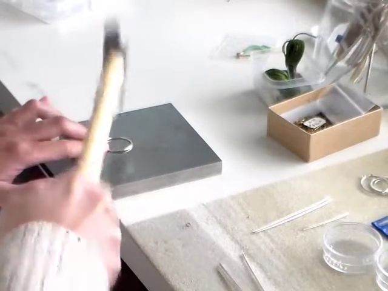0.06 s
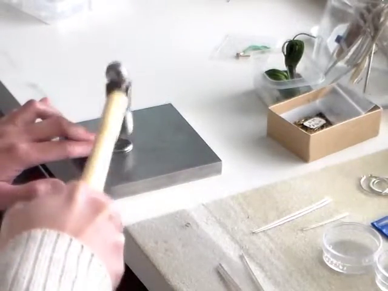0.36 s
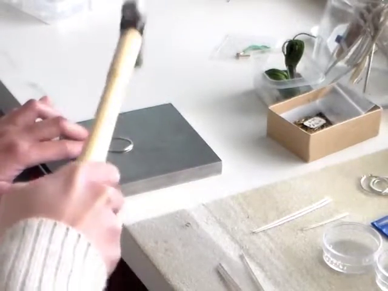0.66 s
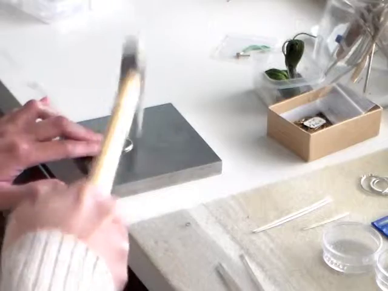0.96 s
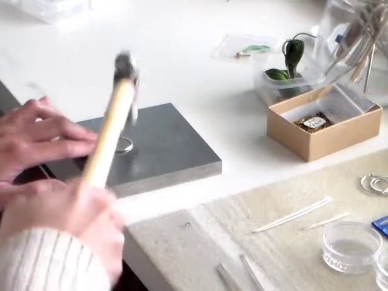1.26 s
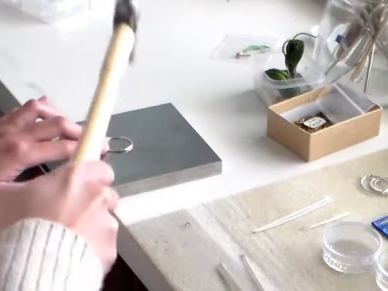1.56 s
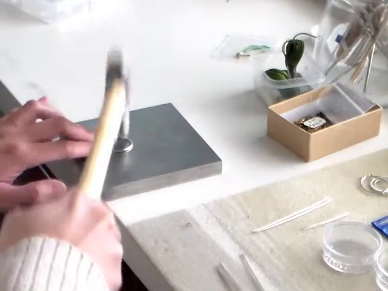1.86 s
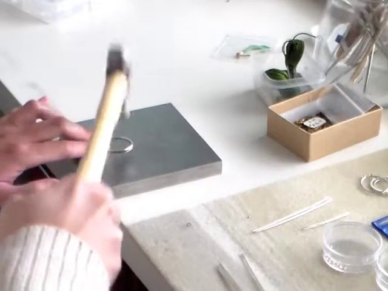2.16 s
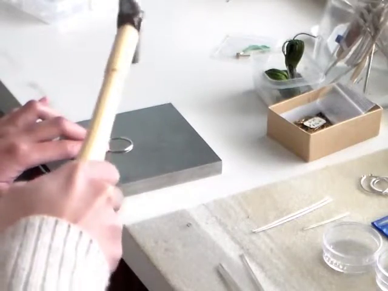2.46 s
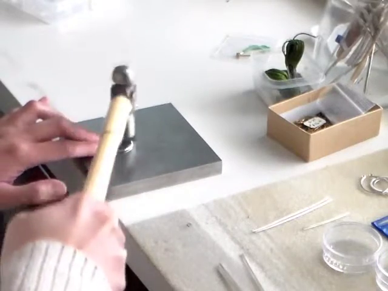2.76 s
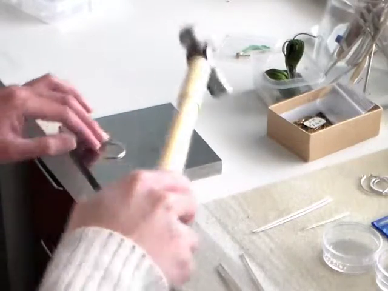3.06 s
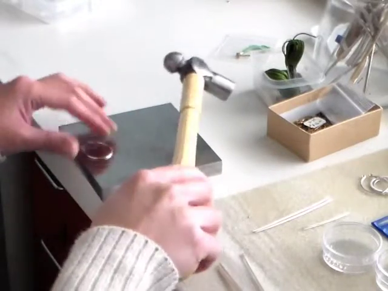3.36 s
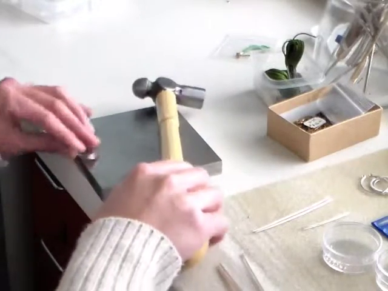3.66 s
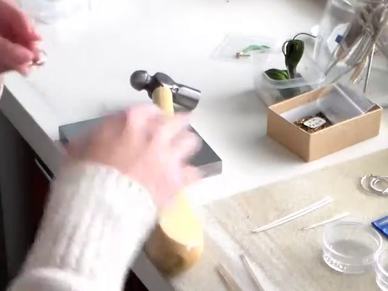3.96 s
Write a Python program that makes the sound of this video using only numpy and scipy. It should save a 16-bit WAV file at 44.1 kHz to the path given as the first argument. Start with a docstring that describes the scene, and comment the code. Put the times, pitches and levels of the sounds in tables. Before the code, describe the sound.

Quick, even hammer blows on a ring against steel, then the hammer is set down.

```python
"""Sharp, steady blows of a small hammer on a metal ring on a steel block, close by in a quiet workroom.
Each blow cracks, rings the hammer head and block, and sends a bending wave through the bench;
the room answers. Then the ring is slid off, the head is set on the block and the wooden handle
knocks down. A limiter ducks at every blow."""
import sys
import numpy as np
from scipy import signal
from scipy.fft import rfft, irfft
from scipy.io import wavfile
from scipy.ndimage import uniform_filter1d, minimum_filter1d

SR = 44100
rng = np.random.default_rng(int(sys.argv[2]) if len(sys.argv) > 2 else 0)


def wrap_up_sound(samples):
    """Save the sound to the file named by the first command line argument, as 16-bit audio."""
    columns = np.atleast_2d(samples).T
    # keep every value between -1 and 1, then stretch to whole-number steps
    tamed = np.clip(columns, -1, 1)
    steps = np.round(tamed * 32767).astype(np.int16)
    wavfile.write(sys.argv[1], SR, steps)


N = 176400
RESPONSE_N, LEAD_N = 36000, 11025
TIME_S, AGE_S = np.arange(N) / SR, np.arange(RESPONSE_N) / SR
SCENE_HZ, RESPONSE_HZ = np.fft.rfftfreq(N, 1 / SR), np.fft.rfftfreq(RESPONSE_N, 1 / SR)


# Hammer blows. Each row: start in seconds, strength in dB, then treble, head, block, bench offsets in dB.
BLOWS = [(-.18, -1, 0, -1, 0, -2), (0.0425, 4.5, 3.5, 2, 0, 1.5), (0.2625, 1.5, -3.5, 5.5, 0.5, 1.5),
         (0.4819, -4, -7.5, 5.5, -5, 1), (.7066, 9.5, 1, 5.5, 1, -0.5), (0.9291, 3, 3, 2.5, 0.5, 1),
         (1.1513, 2.5, 10.5, -1, -3.5, 0.5), (1.3865, 5, 5, 2.5, 1.5, -1), (1.6084, 3.5, 5.5, -2.5, 1, -1),
         (1.8339, 1, 2.5, 5.5, 1.5, 2), (2.0473, 0, 0, 6, 3, 1), (2.2657, 7, 6, 6, 0.5, 1.5),
         (2.489, 6, 5, 6.5, -2, 3), (2.7075, 5.5, 4.5, 5, 1, 2.5), (2.934, 5, 3.5, 2.5, -0.5, 1.5)]
# Head set on the block, rocking once. Each row: as in BLOWS.
SET_DOWN = [(3.7524, -6, -7.5, 3, -17.5, -23), (3.7850, -30, -8, 11, -13, -20),
            (3.791, -32.5, -13, 13, -15, -20)]

def hammer():
    """Every contact excites the same crack, hammer head, block, bench and room."""
    contacts = np.array(BLOWS + SET_DOWN, float)
    head_db, block_db, bench_db = contacts.T[3:]
    room_db = np.array([0] * len(BLOWS) + [-17] * len(SET_DOWN))
    echoes = room(contacts, room_db)
    head = steel(HEAD_MODES, contacts, head_db, direct_db=-24, scatter_db=-31.5, late_db=-15)
    block = steel(BLOCK_MODES, contacts, block_db, direct_db=-24.5, scatter_db=-18.5, late_db=-21.5)
    cracks = through(force(contacts), crack())
    thumps = through(force(contacts, bench_db), bench())
    return cracks + head + block + thumps + echoes


def force(contacts, offset_db=0, treble_hz=5500):
    """Contact impulses, each with its own strength and brightness."""
    start_s, strength_db, treble_db = contacts.T[:3]
    lows = impulses(start_s, undb(strength_db + offset_db))
    highs = impulses(start_s, undb(strength_db + offset_db + treble_db))
    crossover = signal.butter(3, treble_hz, fs=SR)
    return highs + signal.filtfilt(*crossover, lows - highs + 1e-18)


# Crack spectrum. Each row: frequency in Hz, relative level in dB.
CRACK_SPECTRUM = [(100, -20), (700, -8), (1800, -7.5), (2250, 2), (3200, 1), (5000, -10.5), (8000, -17),
                  (11000, -25), (15000, -35)]

def crack():
    """Click of steel on metal: a minimum-phase pulse."""
    cepstrum = irfft(np.log(undb(read(CRACK_SPECTRUM, RESPONSE_HZ))))
    cepstrum[1:RESPONSE_N // 2] *= 2
    cepstrum[RESPONSE_N // 2:] = 0
    pulse = irfft(np.exp(rfft(cepstrum)))
    return at_level(pulse, -16.5)


# Modes of hammer head and block. Each row: frequency in Hz, relative level in dB, T60 in seconds.
HEAD_MODES = [(3293, -10, 0.029), (3530, -9, 0.019), (3737, -1.5, 0.031), (3862, -6.5, .025),
              (3972, -10.5, 0.019), (4010, -10, .025)]
BLOCK_MODES = [(6540, -17.5, 0.069), (6860, -2.5, 0.067), (6980, -10.5, .3), (6960, 3.5, 0.039),
               (7250, -10.5, .06), (9350, -6.5, 0.033), (9905, -20.5, 0.086)]

def steel(table, contacts, offset_db, direct_db, scatter_db, late_db, wander=0.4):
    """Struck steel rings, direct and scattered; the scatter shifts from blow to blow."""
    start_s, strength_db = contacts.T[:2]
    steady = at_level(modes(table), direct_db) + at_level(scatter(table, late_db), scatter_db)
    shift = wander * undb(strength_db + offset_db) * rng.standard_normal(len(contacts))
    shifting = at_level(scatter(table, late_db), scatter_db)
    return through(force(contacts, offset_db), steady) + through(impulses(start_s, shift), shifting)


# Bending wave spectrum. Each row: frequency in Hz, relative level in dB.
BENDING_SPECTRUM = [(30, -25), (55, -19.5), (100, -19), (200, -2.5), (380, 8.5), (650, -4), (1000, 14),
                    (1500, -6.5), (2500, -33), (6000, -50)]
# Bench top modes. Each row: frequency in Hz, relative level in dB, T60 in seconds.
BENCH_MODES = [(104.8, -2, 0.17), (199.3, -6, .14), (325, -7.5, 0.33), (373.1, 0.5, 0.2), (421.4, -8, 0.23),
               (488, -12.5, 0.5), (528.6, -4, 0.27), (635, 5, 0.095), (789, -34, 0.26), (919, -14.5, 0.36),
               (978, -19, 0.22), (1050, -4.5, 0.22), (1258, -3, .17), (1592, -3.5, 0.16)]

def bench(lag_at_1khz_s=0.004148, lowest_hz=89):
    """A bending wave whose lows arrive late, and a ringing top too small to radiate deep bass."""
    phase_turns = 2 * lag_at_1khz_s * np.sqrt(1000 * RESPONSE_HZ)
    spectrum = undb(read(BENDING_SPECTRUM, RESPONSE_HZ)) * np.exp(-2j * np.pi * phase_turns)
    wave = irfft(spectrum) * (AGE_S < 0.5)
    ringing = modes(BENCH_MODES) * (1 - np.exp(-AGE_S / lag_at_1khz_s))
    low_cut = signal.butter(3, lowest_hz, "high", fs=SR, output="sos")
    return signal.sosfilt(low_cut, at_level(wave, -19) + at_level(ringing, -19.5))


# Handle knocks. Each row: start in seconds, level in dB.
KNOCKS = [(3.755, -34), (3.792, -42), (3.950, -57), (3.961, -44.5), (3.966, -56), (3.992, -44)]
# Knock spectrum. Each row: frequency in Hz, relative level in dB.
KNOCK_SPECTRUM = [(100, -25), (260, -20), (360, 15), (480, 0), (680, 6.5), (1500, -12), (3500, -21),
                  (7000, -33), (14000, -41)]

def handle(t60_s=0.17):
    """The wooden handle jolts and meets the bench in dull knocks."""
    start_s, level_db = np.array(KNOCKS).T
    knock = decaying_bands([(hz, db, t60_s) for hz, db in KNOCK_SPECTRUM], rise_s=0.00054)
    return through(impulses(start_s, undb(level_db)), at_level(knock, 0))


def ring_slide(peak_s=3.695, sigma_s=0.024, pitch_hz=5470, half_width_hz=110):
    """The ring sings faintly as it is drawn off the block."""
    noise = rfft(rng.standard_normal((2, N)))
    rub = irfft(noise / (1 + ((SCENE_HZ - pitch_hz) / half_width_hz) ** 2))
    swell = np.exp(-((TIME_S - peak_s) / sigma_s) ** 2 / 2)
    return rub / rub.std() * undb(-62) * swell


def scatter(table, late_db):
    """Steel modes thrown back by near surfaces and lingering in the room."""
    decay = fade(t60_s=0.15, rise_s=0.0053) + undb(late_db) * fade(t60_s=0.52, rise_s=0.039)
    out = 0
    for mode in table:
        tone = modes([mode])
        mid, side = through(tone, rng.standard_normal((2, RESPONSE_N)) * decay)
        side = side - mid * (mid @ side) / (mid @ mid)  # equal energy left and right
        out = out + np.std(tone) * stereo(at_level(mid, 0), at_level(side, 0), hz=mode[0])
    return out


# Near and late echoes. Each row: frequency in Hz, relative spectral density in dB, T60 in seconds.
NEAR_ECHOES = [(40, -32, .15), (73.5, -8, 0.13), (118.5, -6, 0.34), (154, -5, 0.14), (390, 3.5, 0.17),
               (1100, -0.5, 0.21), (2000, -5, 0.27), (3500, -9.5, 0.25), (5460, -10, 0.16),
               (7080, -7.5, 0.26), (9060, -20, .19), (11800, -29, 0.33), (14800, -23, 0.23)]
LATE_ECHOES = [(40, -11, 0.46), (150, -9.5, .7), (440, 4.5, 0.35), (1200, 1, 0.5), (2200, -16, 0.58),
               (3700, -13.5, 0.57), (7000, -18, 0.43), (10000, -34, 0.18), (14000, -42.5, 0.14)]

def room(contacts, offset_db, near_db=-14.5, late_db=-25.5, near_rise_s=0.0013, wander=0.38):
    """Near reflections and a late tail; part of the near sound changes from blow to blow."""
    start_s, strength_db = contacts.T[:2]
    near = at_level(decaying_bands(NEAR_ECHOES, near_rise_s), near_db)
    late = at_level(decaying_bands(LATE_ECHOES, rise_s=0.039), late_db)
    shift = wander * undb(strength_db + offset_db) * rng.standard_normal(len(contacts))
    shifting = at_level(decaying_bands(NEAR_ECHOES, near_rise_s), near_db)
    return through(force(contacts, offset_db), near + late) + through(impulses(start_s, shift), shifting)


# Room noise spectrum. Each row: frequency in Hz, relative level in dB.
AIR_SPECTRUM = [(15, -10.5), (25, -8.5), (80, -25.5), (113, -15), (164, -31), (318, -25.5), (761, -39),
                (1070, -39), (1290, -37.5), (5840, -45), (14000, -46.5)]
# Hum tones. Each row: frequency in Hz, RMS level in dB.
HUM_TONES = [(107.7, -69), (1034, -75), (1087, -72), (1857, -79)]

def room_tone():
    """Low rumble, soft hiss and a faint hum."""
    mid, side = rfft(rng.standard_normal((2, N)))
    air = irfft(stereo(mid, side, SCENE_HZ) * undb(read(AIR_SPECTRUM, SCENE_HZ)))
    hum = sum(np.sqrt(2) * undb(db) * np.sin(2 * np.pi * hz * TIME_S) for hz, db in HUM_TONES)
    return air / air.std() * undb(-52.5) + hum


# Stereo width. Each row: frequency in Hz, ratio of side to mid.
STEREO_WIDTH = [(100, 0.24), (500, 0.081), (2000, 0.23), (4000, 0.59), (7000, 0.77), (14000, 0.98)]

def stereo(mid, side, hz):
    """Left and right; treble is wider than bass."""
    width = read(STEREO_WIDTH, hz)
    return (mid + width * side * np.array([[1], [-1]])) / np.sqrt(1 + width ** 2)


def decaying_bands(table, rise_s):
    """Dense echoes: third-octave noise bands, each with its own level and decay."""
    noise = rfft(rng.standard_normal((2, RESPONSE_N)))
    third_octaves = 3 * np.log2(np.maximum(RESPONSE_HZ, 1))
    out = 0
    for band in range(16, 43):
        hz = 2 ** (band / 3)
        db, t60_s = read(table, hz), read(table, hz, column=2)
        triangle = np.maximum(1 - abs(third_octaves - band), 0)
        mid, side = irfft(noise * triangle) * fade(t60_s, rise_s)
        out = out + np.sqrt(hz) * stereo(at_level(mid, db), at_level(side, db), hz)
    return out


def modes(table):
    """Decaying sines of alternating sign."""
    return sum((-1) ** k * undb(db - 60 * AGE_S / t60_s) * np.sin(2 * np.pi * hz * AGE_S)
               for k, (hz, db, t60_s) in enumerate(table))


def fade(t60_s, rise_s):
    """Quick swell, exponential decay."""
    return (1 - np.exp(-AGE_S / rise_s)) * np.exp(-np.log(1000) * AGE_S / t60_s)


def impulses(start_s, gains):
    """One impulse per contact, on a time line starting LEAD_N samples early."""
    return np.bincount(np.round(start_s * SR).astype(int) + LEAD_N, gains, N + LEAD_N)[:N + LEAD_N]


def through(x, response):
    """Convolve into two channels."""
    wet = signal.oaconvolve(np.atleast_2d(x), np.atleast_2d(response), axes=-1)
    return wet[:, :len(x)] * np.ones((2, 1))


def read(table, hz, column=1):
    """Interpolate a column over log frequency."""
    rows = np.array(table, float)
    return np.interp(np.log(np.maximum(hz, 1)), np.log(rows[:, 0]), rows[:, column])


def at_level(x, db):
    """Scale a response to a level, its energy spread over 0.1 s."""
    return x * undb(db) / np.sqrt(np.mean(np.sum(x ** 2, axis=-1)) * 10 / SR)


def undb(db):
    """Decibels to gain."""
    return 10 ** (np.asarray(db) / 20)


def scene(balance_db=-0.3):
    """All sources at the microphone."""
    impacts = (hammer() + handle())[:, LEAD_N:]
    balance = undb(np.array([[balance_db], [-balance_db]]) / 2)
    return (impacts + ring_slide() + room_tone()) * balance


def record(dry):
    """A limiter ducks at each peak, holds and recovers; the top treble is cut."""
    threshold_db, ratio, hold_s, release_db_per_s, top_hz = -5.5, 5.73, 0.085, 92, 14150
    peak_db = 20 * np.log10(abs(dry).max(axis=0) + 1e-9)
    cut_db = np.maximum(peak_db - threshold_db, 0) * (1 - 1 / ratio)
    half_hold_n = int(hold_s * SR / 2)
    held_db = -minimum_filter1d(-cut_db, 2 * half_hold_n + 1, origin=half_hold_n, mode="constant")
    ramp_db = release_db_per_s * TIME_S
    duck_db = np.maximum.accumulate(held_db + ramp_db) - ramp_db
    gain_db = uniform_filter1d(minimum_filter1d(-duck_db, size=89), size=89)  # 2 ms look-ahead
    high_cut = signal.ellip(8, 0.2, 70, top_hz, fs=SR, output="sos")
    return signal.sosfilt(high_cut, dry * undb(gain_db))


dry = scene()
out = record(dry)
wrap_up_sound(out)
```